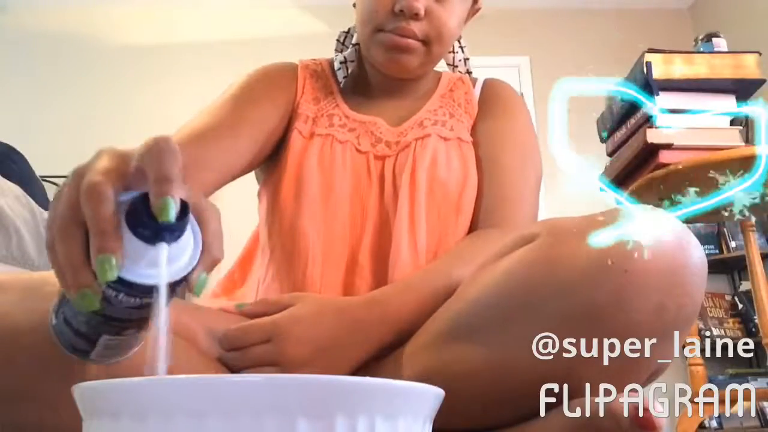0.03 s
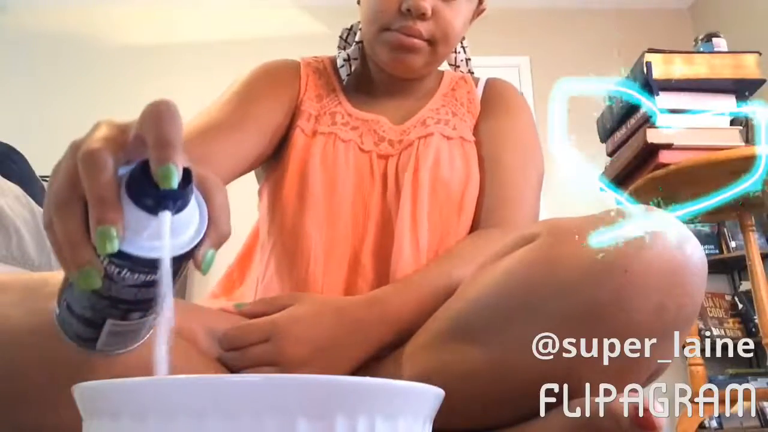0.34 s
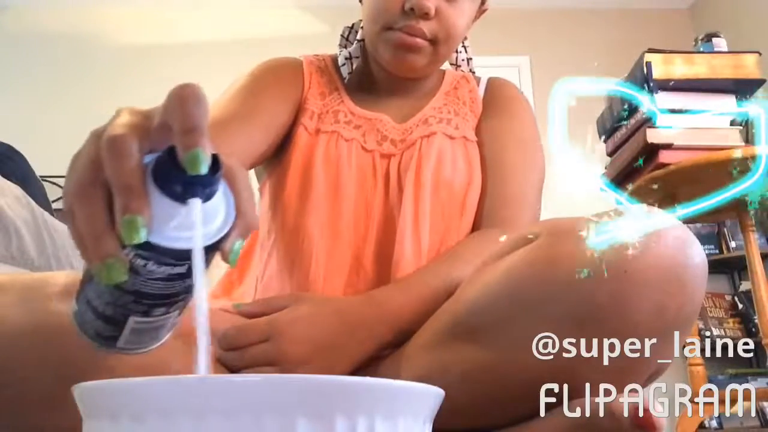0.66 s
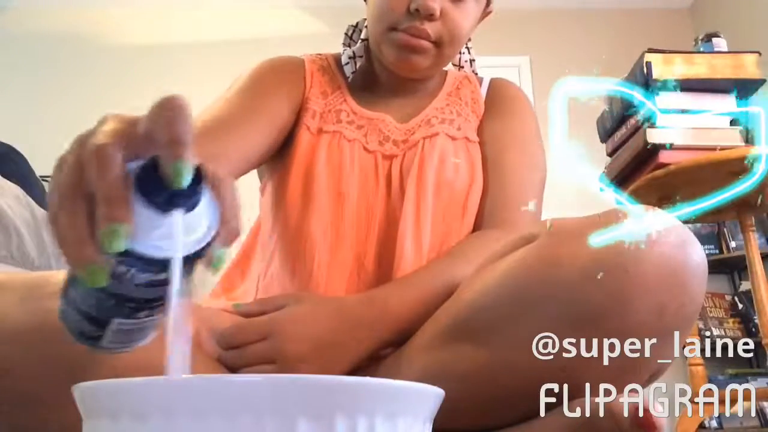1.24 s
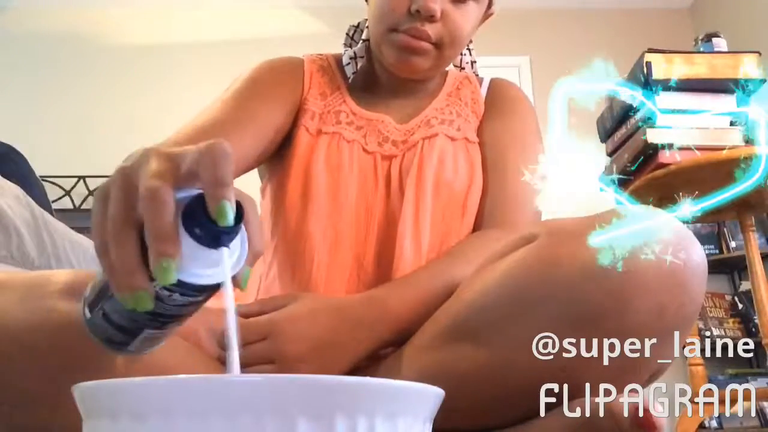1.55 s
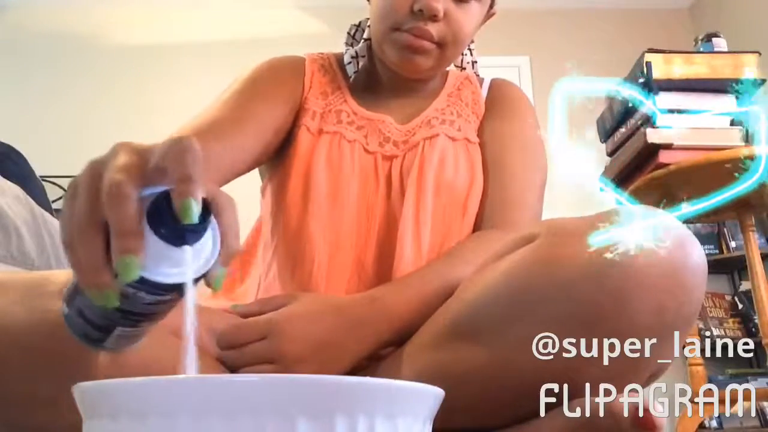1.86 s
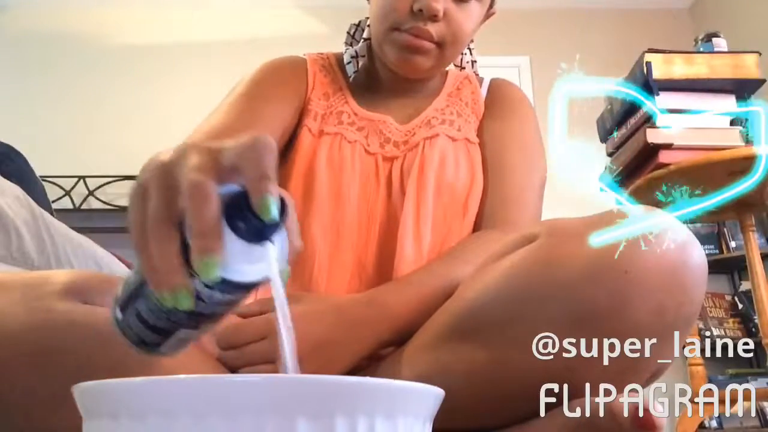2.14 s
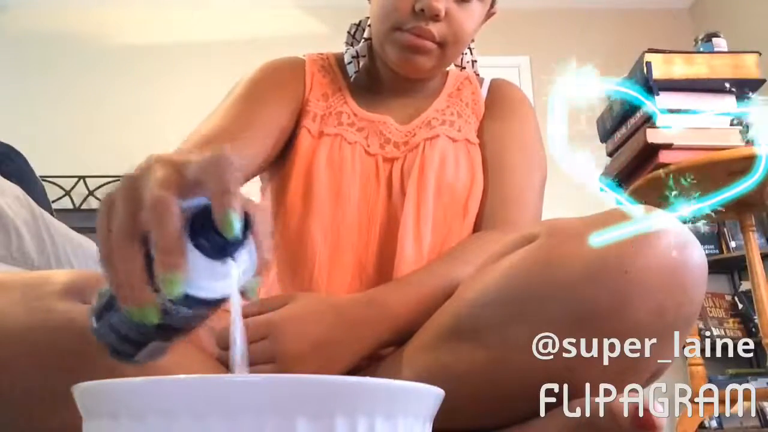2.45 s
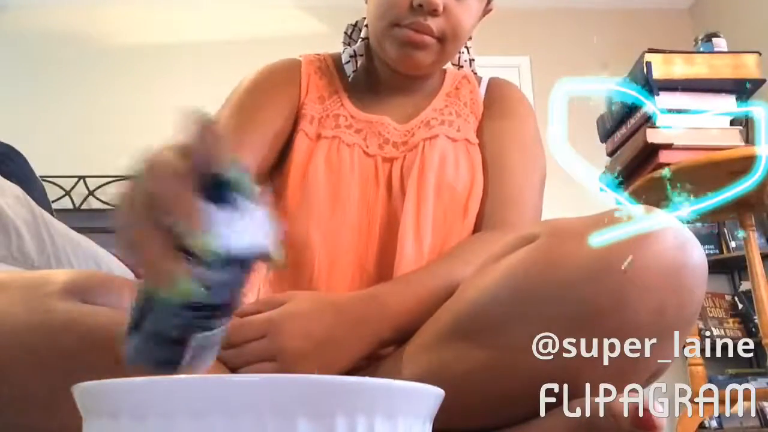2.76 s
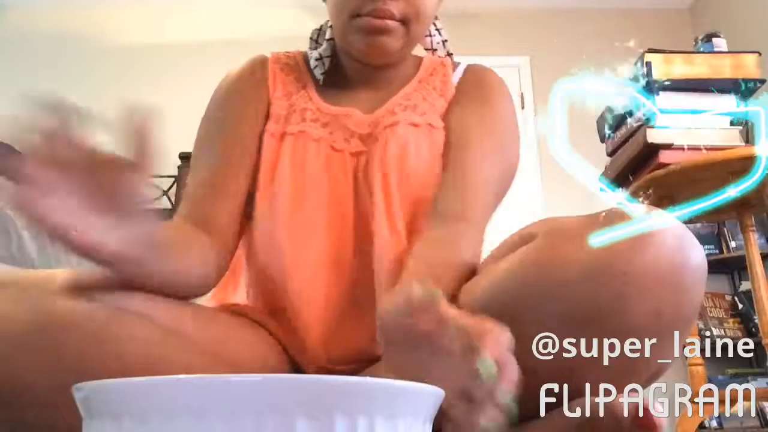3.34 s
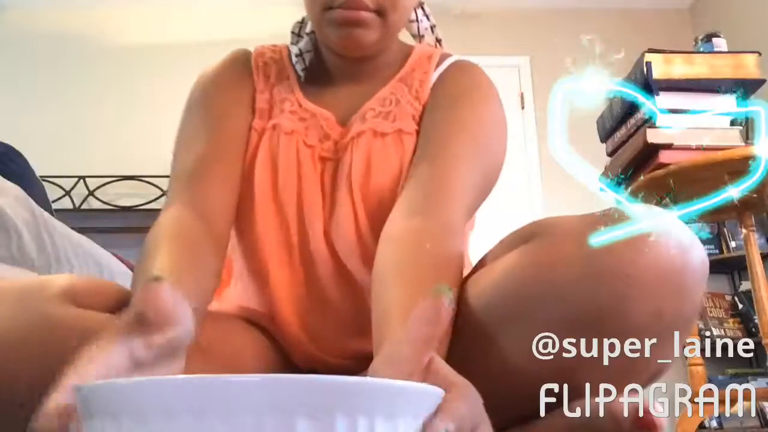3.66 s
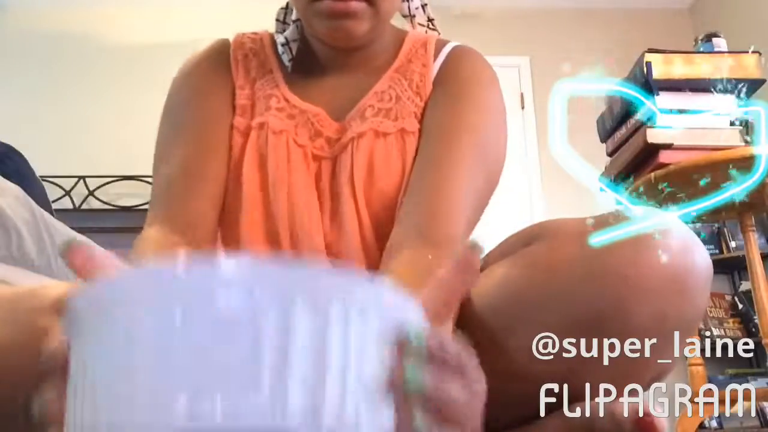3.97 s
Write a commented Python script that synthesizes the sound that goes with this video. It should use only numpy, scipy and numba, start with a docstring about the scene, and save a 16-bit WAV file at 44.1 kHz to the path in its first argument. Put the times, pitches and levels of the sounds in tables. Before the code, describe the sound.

An aerosol can sprays foam with a sputtering hiss, then is set down.

```python
"""A crackling, sputtering hiss, close by in a small room: a can sprays foam into a plastic bowl.
Gas pockets burst in the nozzle, blobs of foam plop out, and the bowl's echo shifts as the hand moves.
The valve shuts and the can is set down with a soft knock. Then hands brush over cloth and take
hold of the bowl. A low room hum lies under it all."""
import sys
import numpy as np
from scipy import signal
from scipy.fft import rfft, irfft
from scipy.io import wavfile
from scipy.ndimage import map_coordinates
from numba import njit

SR = 44100
rng = np.random.default_rng(int(sys.argv[2]) if len(sys.argv) > 2 else 0)


def master_out(mix):
    """Clip the mix to full scale and print it as 16-bit PCM to the path in sys.argv[1]."""
    frames = np.transpose(np.atleast_2d(mix))
    ceiling = np.clip(frames, -1, 1)
    pcm = np.round(ceiling * 32767).astype(np.int16)
    wavfile.write(sys.argv[1], SR, pcm)


N = 176400
T = np.arange(N) / SR


def undb(db):
    """Turn decibels into a multiplier."""
    return 10 ** (np.asarray(db) / 20)


def unit(x):
    """Scale a signal to an average (rms) size of 1."""
    return x / np.sqrt(np.mean(x ** 2) + 1e-20)


def curve(rows, column=1):
    """Join one column of a table with straight lines in time."""
    rows = np.array(rows)
    return np.interp(T, rows[:, 0], rows[:, column])


def noise():
    """White noise: an even hiss."""
    return rng.standard_normal(N)


def walk(hz):
    """A smooth random wander of size 1; higher hz moves faster."""
    return unit(signal.sosfilt(signal.butter(2, hz, fs=SR, output="sos"), noise()))


def pops(per_s, spread_db):
    """Random one-sided clicks, a few much larger than the rest."""
    size = undb(spread_db * np.minimum(rng.exponential(size=N), 4.3))
    clicks = size * (rng.random(N) < per_s / SR)
    return unit(clicks.mean() - clicks)


def colour(x, points, size=8192):
    """Shape the tone. Each point: frequency in Hz, gain in dB."""
    hz, db = np.array(points).T
    f = np.maximum(np.fft.rfftfreq(size, 1 / SR), 1)
    cepstrum = irfft(np.log(undb(np.interp(np.log(f), np.log(hz), db))))
    cepstrum[1:size // 2] *= 2  # folded so that nothing rings before a click
    cepstrum[size // 2 + 1:] = 0
    return signal.fftconvolve(x, irfft(np.exp(rfft(cepstrum))))[:N]


def split(x, edges_hz):
    """Cut a sound into bands that add up to it."""
    f, spectrum = np.fft.rfftfreq(N, 1 / SR), rfft(x)
    below = [0] + [1 / (1 + (f / hz) ** 16) for hz in edges_hz] + [1]
    return [irfft(spectrum * (b - a), N) for a, b in zip(below, below[1:])]


def ring(x, hz, width_hz):
    """Make a sound ring at one pitch."""
    return signal.lfilter(*signal.iirpeak(hz, hz / width_hz, fs=SR), x)


@njit
def glide(x, hz, width_hz):
    """Make a sound ring at a moving pitch."""
    y, state, low = np.empty(len(x)), 0., 0.
    for i in range(len(x)):
        step, damping = np.tan(np.pi * hz[i] / SR), width_hz / hz[i]
        band = (state + step * (x[i] - low)) / (1 + step * (step + damping))
        state, low = 2 * band - state, low + 2 * step * band
        y[i] = damping * band
    return y


def late(x, ms):
    """Delay a sound by a changing time."""
    return map_coordinates(x, [(T - ms / 1000) * SR], order=3)


def struck(blows, modes, ring_db):
    """Soft pushes give a dead thud and a short ring."""
    push = sum(undb(db) * np.exp(-((T - s) / contact) ** 2) for s, db, contact in blows)
    t = T[:SR // 5]
    body = sum(undb(db) * np.cos(2 * np.pi * hz * t) * 1000 ** (-t / t60) for hz, db, t60 in modes)
    return -push / 2 - undb(ring_db) * signal.fftconvolve(push, body)[:N] / 2


def background():
    """Low room noise and a steady hum."""
    # The noise's tone and the hum's notes. Each row: frequency in Hz, level in dB.
    rumble_tone = [(25, -35.5), (39, -20), (56, -1), (95, -10), (165, -7.5), (230, -10.5), (280, -15.5),
                   (400, -17.5), (550, -24), (850, -26.5), (1100, -32), (2500, -42), (6000, -43.5),
                   (15000, -50)]
    hum_notes = [(59.5, -70), (177, -68.5), (834, -84.5)]
    hum = sum(undb(db) * unit(np.sin(2 * np.pi * (hz * T + rng.random()) + 0.22 * walk(1.8)))
              for hz, db in hum_notes)
    return hum + undb(-60.5) * unit(colour(noise(), rumble_tone))


def room(x, fade_s=0.22):
    """A furnished room adds a short, soft tail of echoes."""
    # The tail's tone. Each row: frequency in Hz, gain in dB.
    tone = [(200, 2), (700, 1), (1050, -5), (1400, 0.5), (2100, 1), (3600, -3.5), (4600, 4), (6000, 1.5),
            (7500, -3.5), (10000, -8), (15000, -8)]
    t = T[:SR // 2]
    tail = rng.standard_normal(len(t)) * 1000 ** (-t / fade_s) * np.clip(t / 0.0017, 0, 1)
    return undb(-11.5) * colour(signal.fftconvolve(x, tail / np.linalg.norm(tail))[:N], tone)


def scrapes(attack_s=0.015, squeak_hz=3000, squeak_s=0.013):
    """Palms catch on the bowl in short gritty strokes; skin squeaks faintly."""
    # Each row: a stroke's start in seconds, level in dB, decay in seconds.
    strokes = [(3.795, -55, 0.021), (3.818, -58, .018), (3.85, -63, 0.011)]
    # The grit's tone. Each row: frequency in Hz, gain in dB.
    tone = [(300, -10), (800, -13), (1800, 4), (3000, -1), (4800, -12), (7500, -23), (15000, -32)]
    # Each row: a squeak's time in seconds, peak in dB.
    skin_squeaks = [(3.365, -76), (3.418, -74)]
    level = sum(undb(db) * np.clip((T - s) / attack_s, 0, 1) * np.exp(-np.maximum(T - s, 0) / decay)
                for s, db, decay in strokes)
    grit = unit(colour(pops(per_s=1800, spread_db=1.8), tone))
    presses = sum(undb(db) * np.exp(-((T - s) / squeak_s) ** 2) for s, db in skin_squeaks)
    return level * grit + presses * np.sin(2 * np.pi * squeak_hz * T + .8 * walk(90))


def hands(rim_hz=1650, rim_width_hz=150):
    """Skin slides over cloth, then slips on the bowl, makes its rim sing and taps it."""
    # Loudness of cloth, rubbing and rim. Each row: time in seconds, level in dB.
    slide_level = [(3.26, -92), (3.39, -69), (3.58, -71), (3.71, -78), (3.85, -83), (4, -92)]
    rub_level = [(3.3, -80), (3.55, -71), (3.62, -66.5), (3.785, -67), (3.81, -59.5), (3.875, -60),
                 (3.92, -60.5), (3.96, -63), (3.98, -81)]
    rim_level = [(3.45, -102), (3.58, -81), (3.69, -72), (3.77, -74), (3.83, -73), (3.94, -68), (3.99, -90)]
    # Tone of cloth and rubbing. Each row: frequency in Hz, gain in dB.
    slide_tone = [(800, -9), (2500, -4), (3900, 0.5), (5500, -4.5), (7500, 2), (9000, -2), (15000, 0)]
    rub_tone = [(150, -12), (400, 2.5), (750, -12), (1200, -4), (1800, -7.5), (2400, -11), (4700, -15),
                (8300, -30), (15000, -34)]
    # Each row: a tap's time in seconds, strength in dB, contact time in seconds.
    taps = [(3.902, -43.5, 0.00019), (3.9048, -59, 0.00018)]
    # The bowl's notes. Each row: pitch in Hz, gain in dB, seconds to fade by 60 dB.
    notes = [(480, -4, 0.028), (680, -10, 0.027), (1174, 1, 0.031), (1680, -6, .04)]
    slide = unit(colour(noise(), slide_tone)) * undb(curve(slide_level) + walk(30))
    slips = pops(per_s=9000, spread_db=1.6) * undb(1.4 * walk(60))
    rub = unit(colour(slips, rub_tone)) * undb(curve(rub_level))
    rim = unit(ring(ring(slips, rim_hz, rim_width_hz), rim_hz, 2 * rim_width_hz))
    return slide + rub + rim * undb(curve(rim_level)) + scrapes() + struck(taps, notes, ring_db=-16.5)


def knocks(crack_s=0.0058):
    """The can lands dully, with a faint crack at each contact."""
    # Each row: a landing's time in seconds, strength in dB, contact time in seconds.
    blows = [(3.1334, -46.5, 0.00061), (3.1365, -33.5, 0.00017), (3.1393, -36.5, .0005)]
    # The knock's notes. Each row: pitch in Hz, gain in dB, seconds to fade by 60 dB.
    notes = [(362, -2.5, 0.013), (613, -24, 0.00827), (1240, -3, 0.021), (1650, -2, 0.014),
             (2130, -1, 0.0099)]
    bursts = sum(undb(db) * np.exp(-np.abs(T - s) / crack_s) for s, db, _ in blows) * noise()
    crack = colour(bursts, [(3000, 7.5), (6000, -5), (15000, -10)])
    return struck(blows, notes, ring_db=-22) + undb(-34) * crack


def tick(at_s=2.804, decay_s=0.006):
    """The nozzle ticks faintly as the finger lets go."""
    hiss = unit(colour(noise(), [(500, 0), (1500, -1), (4000, -4), (7000, -12), (15000, -15)]))
    return undb(-61) * hiss * np.exp(-np.abs(T - at_s) / decay_s)


def squeaks(per_s=220, low_hz=4580, high_hz=12600, cycles=3.5):
    """Tiny bubbles chirp for a few cycles, each at its own pitch."""
    chirps, t = np.zeros(N + 1024), np.arange(-512, 512) / SR
    for when, pitch, size, length in rng.random((int(per_s * N / SR), 4)):
        hz = low_hz * (high_hz / low_hz) ** pitch
        gain = undb(-5 * np.log(size + 0.1))
        fade = np.exp(-np.abs(t) * hz / (cycles * (0.35 + length)))
        i = int(when * N)
        chirps[i:i + len(t)] += gain * fade * np.sin(2 * np.pi * hz * t)
    return undb(-50) * unit(chirps[:N])


def sputter():
    """Blobs of foam break off with short hollow blips; the biggest ones plop."""
    # Each row: a blip's pitch in Hz, width in Hz, gain in dB.
    blip_notes = [(830, 650, -4), (1650, 780, -11)]
    # Each row: a big blob's time in seconds, strength in dB, push time in seconds.
    big_blobs = [(1.295, -31.5, .0002), (1.3284, -27, .0002), (1.7751, -25.5, 0.00017),
                 (2.4445, -26, 0.00016), (2.489, -30, 0.00029), (2.5225, -26.5, 0.0003),
                 (2.5555, -24, 0.00015), (2.5634, -29, 0.0004), (2.6155, -27, 0.00032)]
    # Each row: a plop's pitch in Hz, gain in dB, seconds to fade by 60 dB.
    plop_notes = [(308, -26, 0.034), (953, 0.5, 0.044), (1280, -9, 0.014), (1850, -10, 0.011)]
    small_blobs = pops(per_s=170, spread_db=-0.5)
    blips = unit(sum(undb(db) * ring(small_blobs, hz, width) for hz, width, db in blip_notes))
    plops = struck(big_blobs, plop_notes, ring_db=-21.5)
    bass_cut = signal.butter(3, 170, "high", fs=SR, output="sos")
    return undb(-49) * blips + signal.sosfilt(bass_cut, plops)


def spits(fizz_s=0.0018):
    """Larger gas pockets chirp raggedly through the nozzle, each in a brief fizz."""
    # Each row: a spit's time in seconds, peak in dB, pitch in Hz, decay in seconds.
    pockets = [(.142, -29.5, 7610, .0008), (0.1627, -17, 7750, 0.00062), (.1884, -26, 7970, .0008),
               (.2054, -26, 7610, .0007), (.3674, -24, 7700, .0007), (.397, -24.5, 7700, .0009),
               (0.463, -17, 7900, .00036), (.482, -25, 7640, .0022), (.4906, -30, 7560, .0011),
               (0.538, -17, 7400, 0.00059), (.5524, -23.5, 7300, .0013), (.5655, -18, 8100, 0.0004),
               (0.5724, -22, 7200, 0.001), (0.6474, -20, 7900, 0.00063), (0.725, -27, 7510, .0018),
               (.7939, -25, 7490, .0006), (0.843, -26, 8260, .0006), (0.882, -24, 4500, .0004),
               (.9105, -25, 7640, .0009), (1.0229, -28, 8300, 0.00051), (1.211, -22, 8600, 0.00049),
               (1.243, -23, 7800, .0006), (1.3144, -29, 7860, .001), (1.349, -26.5, 7770, .001),
               (1.542, -25, 7700, 0.00071), (1.682, -30, 4200, .002), (1.692, -32, 6030, 0.0018),
               (1.7475, -26.5, 6540, .0008), (2.0042, -24.5, 8140, .0005), (2.198, -24, 10100, 0.00054),
               (2.208, -29, 5580, .0012), (2.2408, -30, 9650, 0.002), (2.2708, -31, 5070, 0.0011),
               (2.367, -23, 9930, .0006), (2.43, -35, 8690, .0006), (2.615, -25, 5440, .0004),
               (2.6833, -18, 7700, 0.00033), (2.6911, -29.5, 7300, .0013)]
    # The fizz's tone. Each row: frequency in Hz, gain in dB.
    tone = [(3000, -6.5), (6000, -16), (7200, -2), (9000, -1.5), (12000, -13.5), (15000, -12)]
    wobble = .9 * walk(800)
    chirps, fizz = np.zeros(N), np.zeros(N)
    for s, db, hz, decay in pockets:
        near = slice(int(s * SR) - 2048, int(s * SR) + 2048)
        t = T[near] - s
        chirps[near] -= undb(db) * np.exp(-np.abs(t) / decay) * np.cos(2 * np.pi * hz * t + wobble[near])
        fizz[near] += undb(db) * np.exp(-np.abs(t) / fizz_s)
    return chirps + undb(-16.5) * fizz * unit(colour(noise(), tone))


def small_spits(hz=7750, width_hz=890, settle_s=1.5, fade_db_per_s=17):
    """Small spits chirp at the nozzle and die away as the flow settles."""
    clicks = pops(per_s=170, spread_db=1.7)
    chirps = unit(ring(ring(clicks, hz, width_hz), hz, 2 * width_hz))
    return chirps * undb(-3 - fade_db_per_s * np.maximum(T - settle_s, 0))


def drifting_notes(rush):
    """The jet rings the hollow of the bowl, and a faint whistle drifts through the hiss."""
    # Each row: time in seconds, level in dB, pitch in Hz.
    hollow = [(0, -46.5, 1010), (.7, -50.5, 914), (1.35, -58, 900), (1.6, -45, 1014), (1.95, -44.5, 937),
              (2.35, -44, 960), (2.66, -47.5, 965)]  # louder and higher as the can sinks towards the bowl
    high_hollow = [(.35, -60, 1700), (.75, -48.5, 1550), (1.1, -51, 1370), (1.35, -51.5, 1470),
                   (1.6, -64, 1610)]  # sounds while the can is held high
    whistle = [(.6, -53, 4950), (.84, -59, 4950), (.98, -53, 5020), (1.1, -50.5, 4960), (1.16, -45, 5370),
               (1.27, -56, 5450), (1.42, -70, 5000), (1.52, -56.5, 4050), (1.69, -53, 4050),
               (1.8, -62, 4100), (2.1, -69, 4800), (2.24, -47.5, 4800), (2.35, -69, 4800)]
    waver = 1 + 0.0087 * walk(9.8)
    return sum(unit(glide(rush, curve(path, 2) * bend, width_hz)) * undb(curve(path))
               for path, bend, width_hz in [(hollow, 1, 120.), (high_hollow, 1, 140.),
                                            (whistle, waver, 230.)])


def jet(flutter_hz=263, surge_hz=19):
    """Bursting gas pockets and a fluttering rush of gas make a dense, crackling hiss."""
    # Each row: time in seconds, then levels in dB for the body, hiss, nozzle and top bands.
    levels = [(0, -37, -44, -54, -44.5), (.16, -37.5, -43, -43.5, -49.5), (.26, -35.5, -45, -45, -49.5),
              (.5, -36, -46, -48.5, -59), (.72, -35.5, -43, -43, -57), (1.04, -35.5, -42.5, -45.5, -48),
              (1.34, -35, -41.5, -41.5, -55), (1.6, -38, -42, -46.5, -48), (2.05, -37.5, -44, -48, -49),
              (2.22, -36.5, -42, -46.5, -48), (2.42, -36, -40, -46, -46.5), (2.62, -36, -40, -45.5, -48),
              (2.69, -37.5, -39, -44.5, -47)]
    # The jet's tone. Each row: frequency in Hz, gain in dB.
    tone = [(60, -39), (170, -13), (300, -13), (420, -8.5), (530, -11.5), (690, 0.5), (800, -2.5),
            (930, -2.5), (1090, -4), (1280, -2.5), (1600, -2), (1900, -2.5), (2200, -6), (2480, -11.5),
            (3250, -10.5), (3700, -5.5), (4150, -9.5), (4500, -10.5), (5000, -15.5), (6050, -13),
            (6800, -7), (7700, -10.5), (9000, -6), (11000, -14.5), (12000, -11), (13500, -20.5),
            (15200, -17)]
    # Nozzle notes, wandering as foam fills and clears it. Each row: pitch in Hz, width in Hz, dB level.
    notes = [(3940, 490, -51.5), (7180, 750, -52)]
    gas = pops(per_s=5000, spread_db=4) + undb(-3) * noise()
    gas *= undb(2 * walk(flutter_hz))
    rush = colour(gas, tone)
    body, hiss, nozzle, top = (unit(band) for band in split(rush, edges_hz=[3050, 6840, 10200]))
    nozzle = undb(-6.5) * nozzle + small_spits()
    surge_db = 1.32 * walk(surge_hz)
    treble_surge_db = surge_db + 2.5 * walk(surge_hz)
    ringing = drifting_notes(rush)
    for hz, width, db in notes:
        ringing += undb(db) * unit(glide(gas, hz * (1 + .018 * walk(5)), float(width)))
    return (ringing + body * undb(curve(levels, 1) - 2.5)
            + hiss * undb(curve(levels, 2) - 5 + surge_db)
            + nozzle * undb(curve(levels, 3) + treble_surge_db)
            + top * undb(curve(levels, 4) - 0.5 + treble_surge_db))


def spray(shut_s=2.684, fade_s=0.022, sway_ms=0.095, sway_hz=1.7):
    """Foam flows until the valve shuts, with moving echoes and a faint ring from the can."""
    # The bowl's echo as the can rises and sinks. Each row: time in seconds, delay in milliseconds.
    bowl_delay = [(0, 0.98), (.35, 1.28), (.7, 1.29), (1.05, 1.28), (1.35, 1.21), (1.55, 1.08),
                  (1.72, 0.98), (1.95, 1.04), (2.3, 1.05), (2.7, 0.98)]
    # Weaker echoes from hand, lap and floor. Each row: delay in milliseconds, gain in dB.
    near_echoes = [(1.45, -18.5), (2.2, -21), (3.12, -18.5), (4.7, -24)]
    valve = np.clip(1 - (T - shut_s) / fade_s, 0, 1)
    flow = (jet() + sputter() + squeaks()) * valve
    echo = 0.45 * late(flow, curve(bowl_delay))
    echo += sum(undb(db) * late(flow, ms + sway_ms * walk(sway_hz)) for ms, db in near_echoes)
    echo = colour(echo, [(5000, -9), (9000, -1), (15000, -15)])
    can_ring = undb(-5) * ring(flow, hz=1375, width_hz=12)
    return flow + echo + spits() + can_ring


def scene():
    """Spray, knocks and hands in the room, in one channel."""
    near, can = spray() + tick() + hands(), knocks()
    return (near + can + room(near + undb(-4.5) * can) + background())[None]


def record(dry):
    """Cut the highest treble, above 15350 Hz."""
    return signal.sosfilt(signal.ellip(10, .2, 70, 15350, fs=SR, output="sos"), dry)


dry = scene()
out = record(dry)
master_out(out)
```